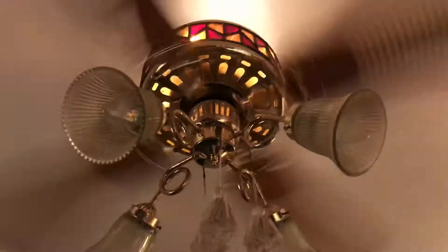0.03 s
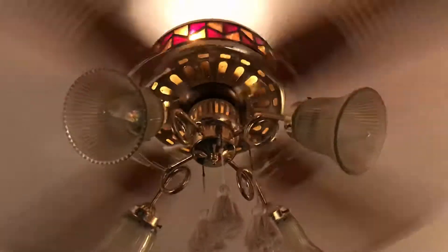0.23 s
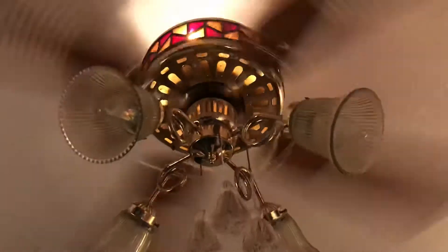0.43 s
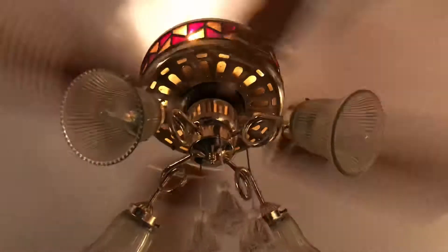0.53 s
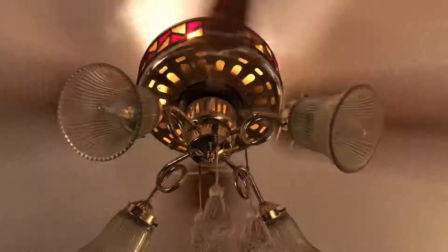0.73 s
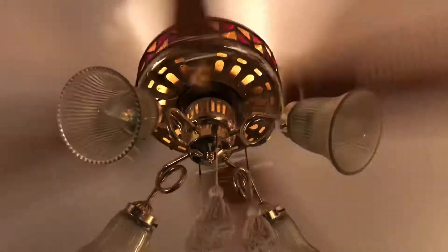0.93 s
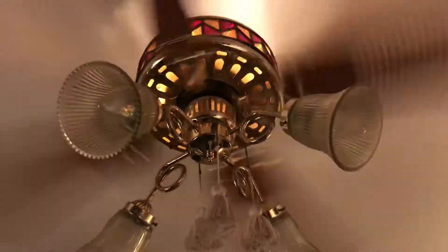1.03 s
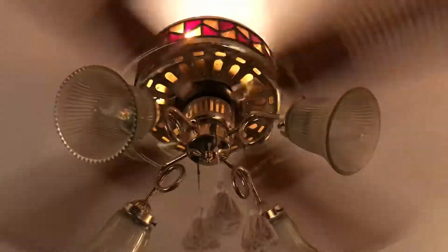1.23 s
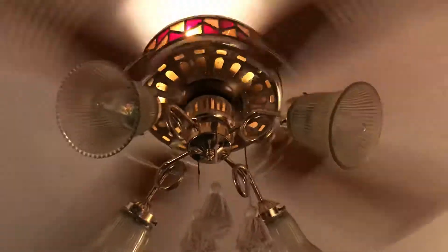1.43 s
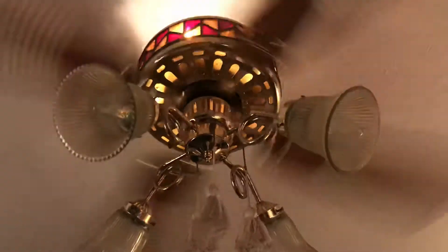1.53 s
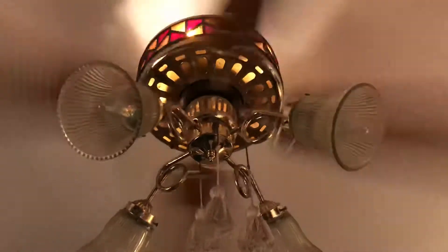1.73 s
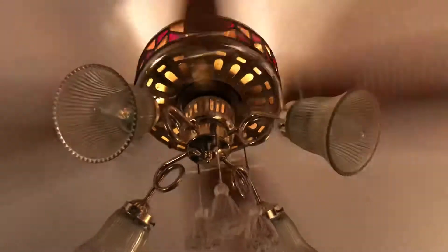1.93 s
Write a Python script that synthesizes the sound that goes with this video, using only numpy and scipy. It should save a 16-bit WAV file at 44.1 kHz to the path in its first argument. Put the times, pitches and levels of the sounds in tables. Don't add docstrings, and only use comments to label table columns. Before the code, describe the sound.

Low, steady ceiling fan whir with light ticks from a loose glass shade, growing clearer later, plus a few dull pull-chain knocks; a burst of wind buffeting hits the microphone near the start, with soft hiss throughout.

```python
import sys
import numpy as np
from scipy import signal
from scipy.fft import rfft, irfft, next_fast_len
from scipy.io import wavfile
from scipy.ndimage import uniform_filter1d, map_coordinates

SR = 44100
rng = np.random.default_rng(int(sys.argv[2]) if len(sys.argv) > 2 else 0)


def digitize_waveform(pressure):
    field = np.atleast_2d(pressure).T
    bounded = np.clip(field, -1, 1)
    quanta = np.round(bounded * 32767).astype(np.int16)
    wavfile.write(sys.argv[1], SR, quanta)


def gain_from_decibels(decibels):
    exponent = np.asarray(decibels, float) / 20
    return 10 ** exponent


N = 88200


def unit(x):
    return x / np.sqrt(np.mean(x ** 2) + 1e-20)


def along(points, hz):
    f, value = np.transpose(points)
    return np.interp(np.log(hz + 1), np.log(f + 1), value)


def bumps(rows, hz):
    return sum(db * np.exp(-((hz - centre) / width) ** 2) for centre, width, db in rows)


def wobble(rate):
    return map_coordinates(rng.standard_normal(400), [np.arange(N) * rate / SR])


def filtered(x, response):
    m = next_fast_len(N + SR // 2)
    return irfft(rfft(x, m) * response(np.fft.rfftfreq(m, 1 / SR)), m)[..., :N]


def noise(colour_db):
    return unit(filtered(rng.standard_normal(N), lambda hz: gain_from_decibels(colour_db(hz))))


def add(track, s, x):
    track[round(s * SR):][:len(x)] += x


# pitch_hz, level_db [dB per Hz]
HISS_COLOUR = [(410, -34.5), (700, -14.5), (873, -7), (1590, -12), (4150, -19), (4910, -20.5), (12300, -25),
               (15600, -27.5)]
# pitch_hz, level_db [dB rms]
CLOCK_LEVELS = [(2000, -102), (3000, -95), (4000, -94.5), (5000, -100), (6000, -95.5), (9000, -100),
                (10000, -103), (15000, -106)]
HISS_DB, CLOCK_HZ = -70.5, 999.17


def recorder_noise():
    t = np.arange(N) / SR
    comb = np.zeros(N)
    for k in range(2, 16):
        level = np.sqrt(2) * gain_from_decibels(along(CLOCK_LEVELS, k * CLOCK_HZ))
        comb += level * np.sin(2 * np.pi * (k * CLOCK_HZ * t + rng.random()))
    return gain_from_decibels(HISS_DB) * noise(lambda hz: along(HISS_COLOUR, hz)) + comb


# pitch_hz, level_db [dB per Hz]
RUSH_COLOUR = [(53, -50), (90, -4.5), (178, -9), (239, -5), (401, -13.5), (431, -12), (698, -27),
               (873, -27.5), (1500, -36.5), (1950, -43), (3300, -120)]
# pitch_hz, width_hz, lift_db
HOUSING_HUM = [(224.7, 14, 5), (289, 8.3, 5), (352.7, 63, 7), (880, 150, 3.5)]
RUSH_DB, PATCHY_DB = -51, 1


def blades():
    rush = noise(lambda hz: along(RUSH_COLOUR, hz) + bumps(HOUSING_HUM, hz))
    spectrum = signal.stft(rush, nperseg=1024)[2]
    patches = uniform_filter1d(rng.standard_normal(spectrum.shape), 4, 0)
    patches = unit(uniform_filter1d(patches, 4, 1))
    patchy = signal.istft(spectrum * gain_from_decibels(PATCHY_DB * patches), nperseg=1024)[1][:N]
    return gain_from_decibels(RUSH_DB) * unit(patchy)


# time_s, level_db
DRAUGHT_STRENGTH = [(0, -59), (.09, -52.5), (.17, -41.5), (.26, -39.5), (.32, -57.5), (.39, -51.5),
                    (.44, -61), (.53, -52.5), (.62, -57.5), (.80, -60), (.91, -52), (1.02, -54),
                    (1.14, -56), (1.32, -52.5), (1.45, -58.5), (1.55, -55), (1.62, -72), (1.84, -59)]
# pitch_hz, level_db [dB per Hz]
RUMBLE_COLOUR = [(20, -20.5), (40, 2), (60, 8), (100, -17), (160, -1), (260, -30), (450, -41)]
LUMPS_DB, LUMPS_PER_S = 1.5, 22


def rumble():
    time_s, level_db = np.transpose(DRAUGHT_STRENGTH)
    colour = [(9.7, -120), *RUMBLE_COLOUR, (1500, -120)]
    lumps = gain_from_decibels(LUMPS_DB * wobble(LUMPS_PER_S))
    lumpy = unit(lumps * noise(lambda hz: along(colour, hz)))
    return gain_from_decibels(np.interp(np.arange(N) / SR, time_s, level_db)) * lumpy


# start_s, peak_db, first pitch_hz, sag [per cycle], life [cycles]
EDDIES = [(0.128, -37, 137, 0.37, 1.9), (0.165, -24, 170, .9, 0.99), (0.1806, -28, 210, 0.2, 1.95),
          (.152, -35.5, 220, 0.68, 2), (0.2002, -24, 170, 0.84, 1.08), (0.2141, -15.5, 291.6, 0.54, 1.87),
          (0.2312, -19, 126, 0.81, 0.93), (0.2432, -29, 136, 1.2, 1.13), (0.2729, -34.5, 400, 1.2, 1.9),
          (0.2762, -28, 213, 0.48, 1.87), (0.2853, -24.5, 220, 0.26, 1.3), (0.302, -40, 202, 0.2, 1.8),
          (0.343, -39, 170, 0.38, 1.6), (0.357, -36, 200, 0.36, 1.63), (0.517, -41.5, 130, 0.82, 1.6),
          (0.542, -37, 110, .5, 0.93), (0.947, -31, 88, 1.1, 1.15), (.964, -34, 237, 0.5, 2.66),
          (1.2216, -34.5, 217, 0.34, 2.5), (1.2365, -35.5, 106, .3, 1.7), (1.2768, -31, 263, 1.13, 2.2),
          (1.08, -40.5, 262, 0.062, 3.5), (1.809, -39, 103, 0.76, 2), (1.926, -40, 150, 0.54, 1.34)]
# start_s, peak_db, first pitch_hz
SWELLS = [(.17, -37.5, 80), (0.474, -49, 80), (0.782, -47, 59), (1.009, -39.5, 78), (1.089, -48.5, 70),
          (1.18, -47, 79), (1.365, -50, 110), (1.496, -44, 80), (1.66, -48, 70), (1.774, -41.5, 60.4),
          (1.899, -49, 70), (1.976, -45, 69.6)]
SWELL_SAG, SWELL_LIFE = 0.28, 2.33
EDDY_RISE = 0.25


def eddies():
    out, t = np.zeros(N + SR), np.arange(SR // 5) / SR
    swells = [(*row, SWELL_SAG, SWELL_LIFE) for row in SWELLS]
    for start, peak_db, hz, sag, life in [*EDDIES, *swells]:
        sag = max(sag, .05)
        cycles = np.log1p(sag * hz * t) / sag
        rise = 1 - np.exp(-(cycles / EDDY_RISE) ** 2)
        fall = np.exp(-(cycles / life) ** 4)
        add(out, start, gain_from_decibels(peak_db) * rise * fall * np.sin(2 * np.pi * cycles))
    return out[:N]


def draught():
    return filtered(rumble() + eddies(), lambda hz: 1 / (1 + (hz / 750) ** 6))


ROOM_DB, ROOM_T60, ROOM_HZ = -9, .2, 6500


def room(x):
    t = np.arange(SR // 3) / SR
    tail = rng.standard_normal(len(t)) * gain_from_decibels(-60 * t / ROOM_T60) * (t > .004)
    tail = gain_from_decibels(ROOM_DB) * tail / np.linalg.norm(tail)
    tail = signal.lfilter(*signal.butter(2, ROOM_HZ, fs=SR), tail)
    return signal.fftconvolve(x, tail + (t == 0))


STRIKE_T = np.arange(SR // 4) / SR
STRIKE_RISE = 1 - np.exp(-STRIKE_T / .0008)


def crack(level_db, t60):
    burst = filtered(rng.standard_normal(N), lambda hz: 1 / (1 + 1j * hz / 9000))
    return gain_from_decibels(level_db - 60 * STRIKE_T / t60) * burst[:len(STRIKE_T)]


# start_s, peak_db, ring pitch_hz
KNOCKS = [
    (.648, -54, 1300),
    (.863, -63, 1200),
    (1.2285, -60, 1400),
    (1.2325, -71, 5550),
    (1.241, -75, 5500),
]
KNOCK_T60, KNOCK_WIDTH_HZ, KNOCK_CRACK_DB = .045, 500, -5


def chain_knocks():
    out = np.zeros(N + SR)
    for s, db, hz in KNOCKS:
        body = noise(lambda f: -20 * np.log10(1 + ((f - hz) / KNOCK_WIDTH_HZ) ** 2))[:len(STRIKE_T)]
        blow = body + crack(KNOCK_CRACK_DB, KNOCK_T60)
        add(out, s, room(gain_from_decibels(db - 60 * STRIKE_T / KNOCK_T60) * STRIKE_RISE * blow))
    return out[:N]


# pitch_hz, level_db, t60_s
GLASS = [(1855, -5, .2), (2570, -2, .06), (3500, -9, .03), (1800, -6, .18), (4995, -4, .04),
         (2690, -5, .05), (6110, -.5, .075), (6460, -3, .035), (7095, -2, .05), (8100, -4, .028),
         (8494, -4, .028), (9334, -5, .035), (11401, 0, .035), (12640, -8, .025)]
SCATTER_DB, FLUTTER, FLUTTER_PER_S = 1, .5, 80


def glass_ring():
    t, ring = STRIKE_T, np.zeros(len(STRIKE_T))
    for hz, level_db, t60 in GLASS:
        scatter, phase = rng.standard_normal(2)
        decay = gain_from_decibels(level_db + SCATTER_DB * scatter - 60 * t / t60)
        onset = np.minimum(t * FLUTTER_PER_S, 1)
        flutter = 1 + FLUTTER * onset * wobble(FLUTTER_PER_S)[:len(t)]
        ring += decay * flutter * np.sin(2 * np.pi * hz * t + 3 * phase)
    return ring


# start_s, peak_db
TICKS = [
    (.0697, -66.5),
    (.3262, -64),
    (.7087, -62),
    (1.0789, -57.5),
    (1.4449, -57),
    (1.805, -59),
]
TICK_DB, CRACK_DB, CRACK_T60 = -7.5, 5, .016


def shade_ticks():
    out = np.zeros(N + SR)
    for s, db in TICKS:
        strike = STRIKE_RISE * (glass_ring() + crack(CRACK_DB, CRACK_T60))
        add(out, s, room(gain_from_decibels(db + TICK_DB) * strike))
    return out[:N]


def scene():
    return (recorder_noise() + blades() + draught() + chain_knocks() + shade_ticks())[None]


# pitch_hz, width_hz, lift_db
CASE = [(4880, 130, -2), (7720, 360, -3.5), (10360, 470, -4.5), (11950, 500, 0)]
LOW_CUT_HZ, TOP_HZ = 42, 15780


def microphone(dry):
    def response(hz):
        low_cut = hz ** 3 / np.hypot(hz ** 3, LOW_CUT_HZ ** 3)
        return gain_from_decibels(bumps(CASE, hz)) * (hz < TOP_HZ) * low_cut
    return filtered(dry, response)


def roll_off(x):
    return signal.sosfilt(signal.butter(12, 15750, fs=SR, output="sos"), x)


def record(dry):
    mix = microphone(dry)
    return roll_off(mix)


dry = scene()
out = record(dry)
digitize_waveform(out)
```